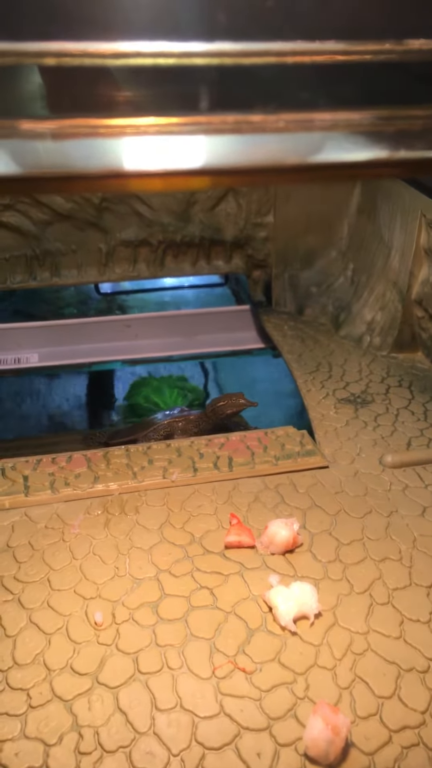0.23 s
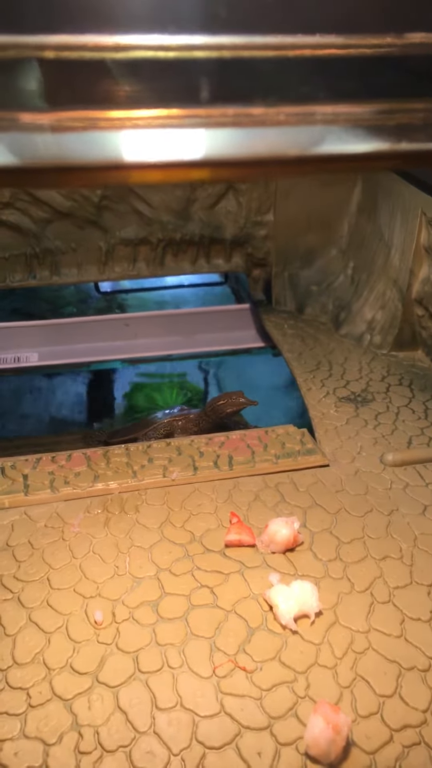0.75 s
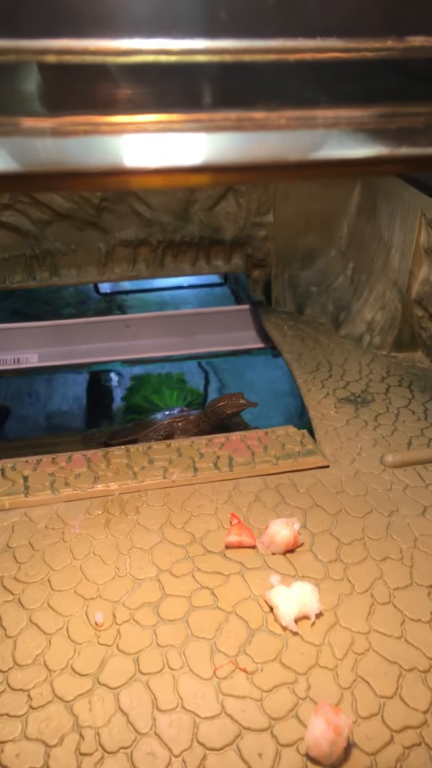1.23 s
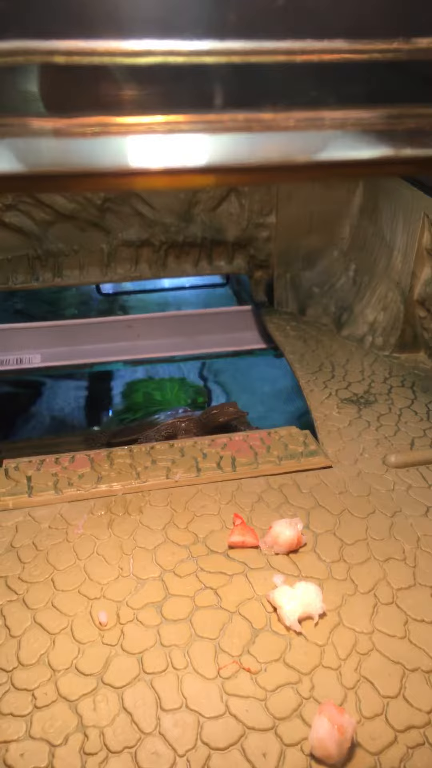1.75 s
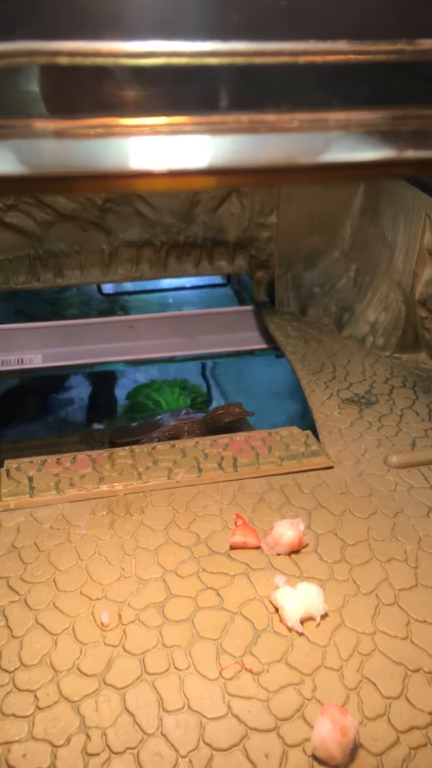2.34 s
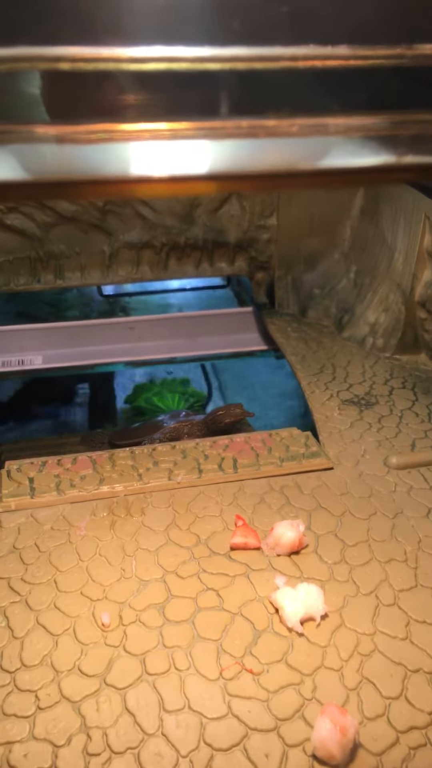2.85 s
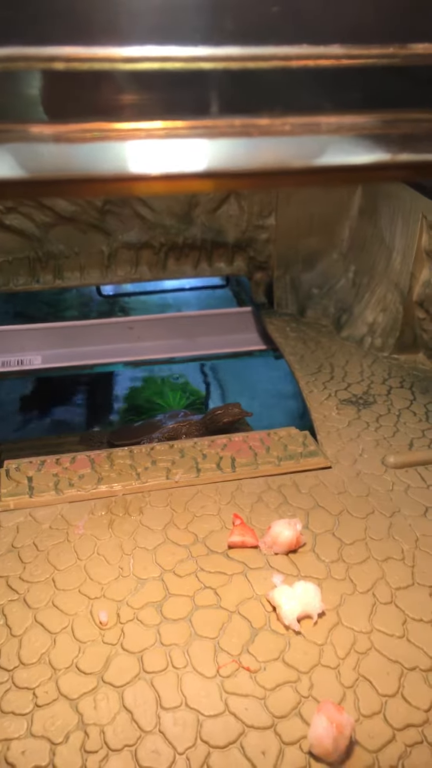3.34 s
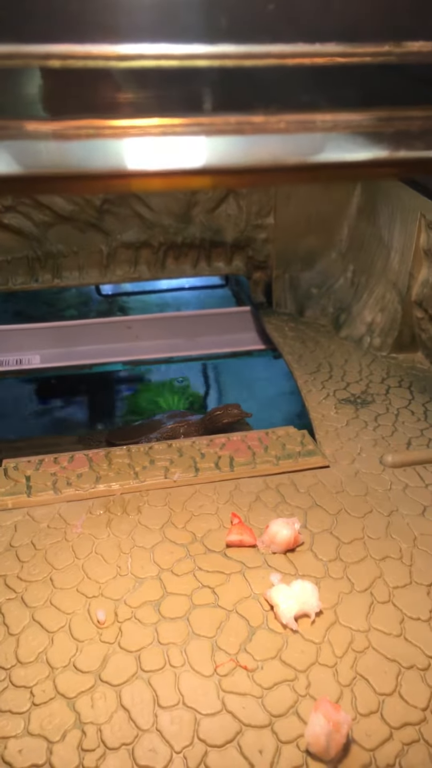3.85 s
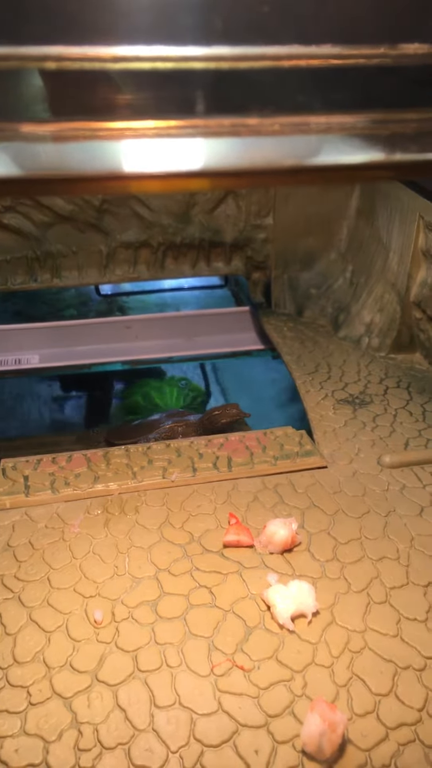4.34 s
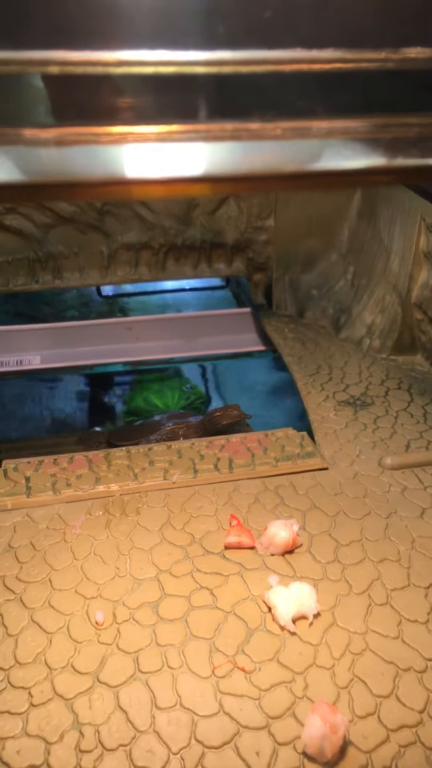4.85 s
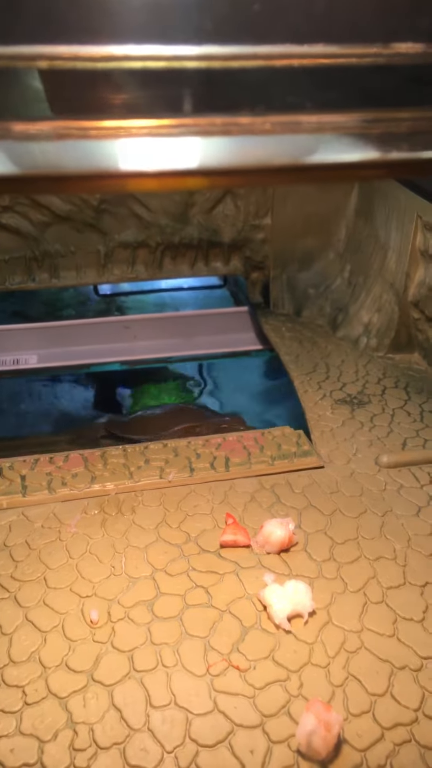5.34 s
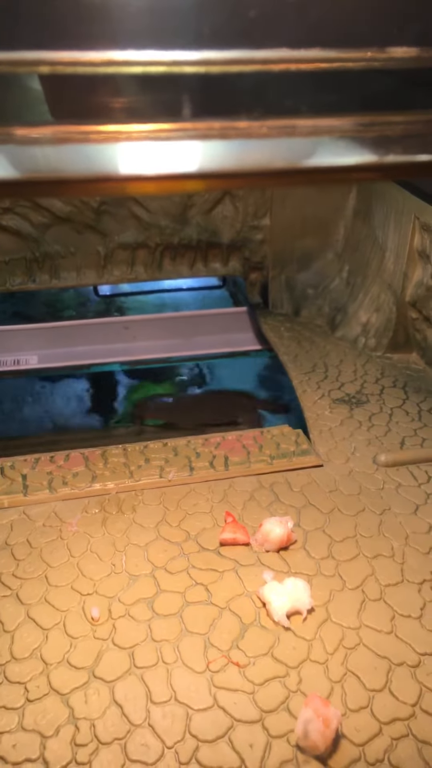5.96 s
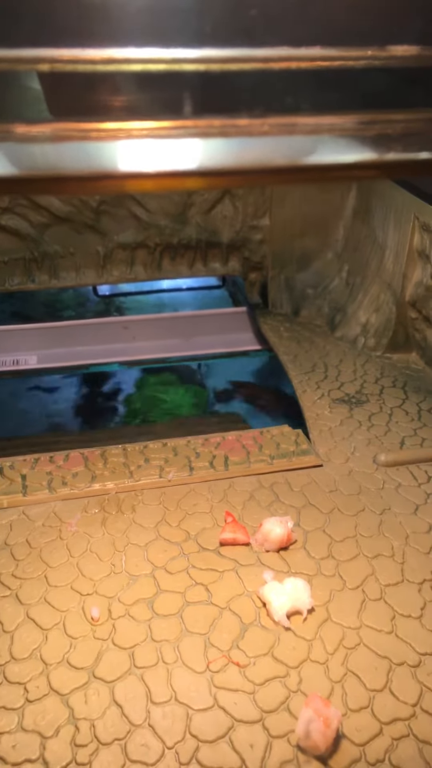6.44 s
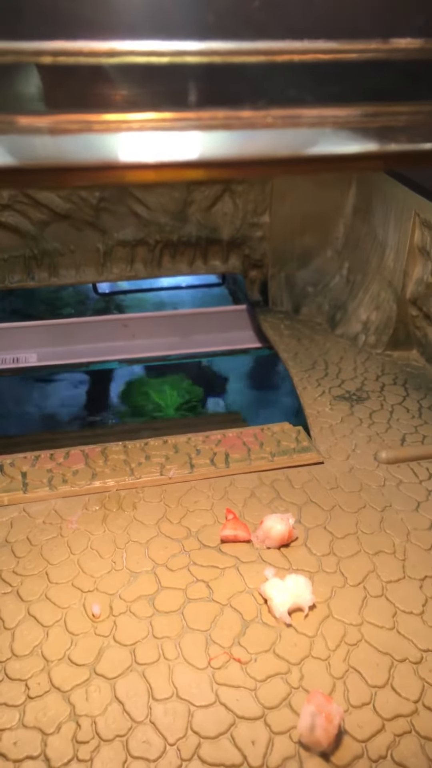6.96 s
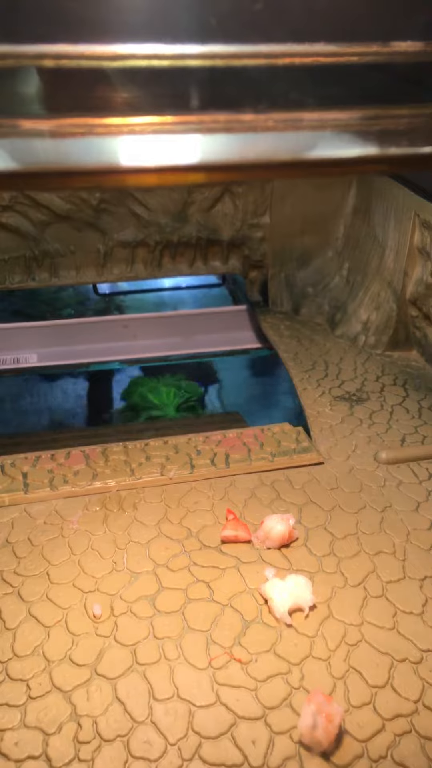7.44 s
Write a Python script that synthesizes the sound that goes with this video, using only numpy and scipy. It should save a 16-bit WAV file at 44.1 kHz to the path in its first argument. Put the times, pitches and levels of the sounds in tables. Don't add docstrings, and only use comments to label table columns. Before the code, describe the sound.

A small mains-driven aquarium pump runs throughout in a quiet room, heard close by a phone microphone. Its deep steady hum carries a faint casing buzz, a soft impeller whirr and a low watery rumble that swells and sinks unevenly several times a second, under a thin hiss. Very faint high bubbles fizz and drip all along. At about 1.9 s a quick cluster of small hard clicks rings brightly, like shell on glass, with another at 2.0 s. Low soft plops and sparse light touches follow at about 2.4 to 3.9 s. Near 5.2 s a brighter scrape and knock begins a run of grainy scuffs and small ticks. A clear click comes at 6.1 s, then a denser knock, clicks and a low, dull plop around 6.3 s. The scuffing fades by 6.5 s, leaving hum, rumble and tiny drips until the end at about 7.7 s.

```python
import sys
import numpy as np
from scipy import signal
from scipy.fft import rfft, irfft, next_fast_len
from scipy.io import wavfile
from scipy.ndimage import uniform_filter1d

SR = 44100
rng = np.random.default_rng(int(sys.argv[2]) if len(sys.argv) > 2 else 0)


def int16_out(signal):
    q = np.round(np.clip(np.atleast_2d(signal).T, -1, 1) * 32767)
    wavfile.write(sys.argv[1], SR, q.astype(np.int16))


def voltage_ratio(decibels):
    exponent = np.asarray(decibels, float) / 20
    return 10 ** exponent


N = 339570

MAINS_HZ = 60.0075
# (multiple of mains [1], level [dB rms])
HUM_LINES = [(1.0, -46.4), (2.0, -64.1), (3.0, -55.9), (4.0, -60.0), (5.0, -69.3), (6.0, -59.9),
             (7.0, -85.1), (8.0, -77.9), (9.0, -78.4), (10.0, -84.9), (11.0, -88.6), (12.0, -90.7),
             (13.0, -81.6), (14.0, -77.7), (15.0, -82.5), (16.0, -84.1), (17.0, -77.2), (18.0, -91.1),
             (19.0, -91.1), (21.0, -82.4), (22.0, -91.5), (23.0, -89.2), (25.0, -98.2), (27.0, -101.9),
             (29.0, -91.3)]
# (multiple of mains [1], level [dB rms])
BUZZ_LINES = [(31, -98), (32, -85), (33, -85), (33.5, -90), (34, -82), (34.5, -93), (35, -87), (35.5, -89),
              (36, -87), (37, -89), (37.5, -95), (38, -87), (39, -95), (40, -95), (47, -100), (49, -99),
              (50, -92), (50.5, -95), (51, -91), (51.5, -92), (52, -84), (53, -97), (57, -94), (58, -99),
              (59.5, -93), (60, -95), (61, -94), (61.5, -94), (62, -96)]
# (centre [Hz], width [Hz], level [dB rms])
WHIRR_BANDS = [(100, 1.1, -66), (105, 1.1, -69), (115.5, .9, -71), (128, .9, -66.5), (241, 5.0, -62.5),
               (3090, 40, -87), (15600, 600, -91), (3588, 90, -85)]
# (frequency [Hz], density [dB per Hz])
RUMBLE_SPECTRUM = [(25, -85), (33, -84), (40, -87), (46, -75.5), (75, -76), (110, -81), (132, -80),
                   (146, -87), (165, -80), (205, -75), (225, -65.5), (256, -79), (270, -75), (345, -74),
                   (410, -92.5), (455, -97.5), (600, -98.5)]
# (frequency [Hz], density [dB per Hz])
HISS_SPECTRUM = [(700, -99.5), (1000, -92.5), (1350, -94.5), (1500, -100), (2100, -103), (2700, -111),
                 (3200, -110), (3800, -110), (4900, -115.5), (5900, -109.5), (6600, -112.5), (9500, -116.5),
                 (10500, -119.5), (15000, -122)]
# (crest time [s], level [dB rms], fade [s per 10 dB])
LOWER_SURGES = [(.2, -45, .4), (.75, -45, .25), (1.07, -50, .05), (1.26, -50, .2), (1.37, -45, .05),
                (1.69, -47, .2), (1.95, -47, .08), (2.07, -44, .08), (2.4, -45, .2), (2.57, -46, .1),
                (2.83, -53, .04), (2.92, -47, .06), (3.28, -47.5, .6), (4.01, -45, .2), (4.48, -48, .5),
                (5.09, -50, .08), (5.34, -47, .04), (5.47, -46, .05), (5.57, -47, .1), (5.7, -45, .11),
                (5.86, -45, .04), (5.95, -47, .04), (6.05, -45, .13), (6.33, -47.5, .15), (6.6, -49, .06),
                (6.73, -46, .06), (6.85, -42.5, .16), (7.24, -45, .25), (7.48, -48, .15), (7.67, -49, .05)]
LOWER_PITCH_HZ = [239, 222, 218, 227, 233, 227, 231, 230, 222, 230, 233, 225, 224, 240, 217, 219, 228, 219,
                  228, 229, 235, 223, 222, 243, 226, 227, 236, 223, 237, 223]
# (crest time [s], level [dB rms])
UPPER_SURGES = [(.22, -51), (.36, -52), (1.08, -52), (1.32, -52), (1.49, -50), (1.96, -52), (2.49, -51),
                (2.96, -51), (3.19, -52), (3.51, -51), (4.05, -51), (4.19, -51), (5.02, -52), (5.26, -51),
                (5.49, -50), (5.87, -52), (6.17, -49), (6.54, -52), (6.74, -52), (7.29, -52), (7.63, -51)]
# (delay [s], level [dB])
WALL_ECHOES = [(.0021, -17), (.0046, -16), (.0077, -15), (0.012, -17)]
# (time [s], level [dB rms])
FIZZ_LEVEL = [(0, -84), (.8, -78), (1.2, -81), (1.6, -79.5), (2.5, -78.5), (3.3, -83), (4, -83), (4.6, -79),
              (5, -78.5), (6.5, -82), (7, -80.5), (7.7, -77.5)]
# (time [s], peak [dB], frequency [Hz])
CLEAR_DROPS = [(.2633, -58, 8100), (.4604, -57, 5230), (.9218, -58, 5570), (.9682, -58, 6560),
               (1.0605, -56, 6080), (1.2146, -52.5, 5900), (1.5953, -56, 6050), (5.0246, -58, 5700),
               (2.6155, -60, 5790), (2.66, -59, 8700), (2.7727, -56, 6020), (3.2731, -54, 5770),
               (3.3499, -55, 5870), (3.1817, -57, 5960), (3.5604, -59, 6800), (3.9829, -59, 5800),
               (4.1725, -58, 6030), (4.2693, -57, 5570), (4.383, -58, 5450), (4.5811, -55, 5800),
               (4.6594, -54, 5860), (4.7153, -53, 5400), (4.839, -57, 6900), (6.4982, -54, 5900),
               (6.6493, -57, 5870), (6.9307, -52.5, 5840), (7.005, -58, 6980), (7.1257, -57, 6810),
               (7.6076, -58, 5850), (7.6421, -57, 5800)]
# (time [s], peak [dB], frequency [Hz], t60 [s])
PLOPS = [(.45, -56, 502, .11), (1.915, -50, 1910, .045), (1.995, -49, 1920, .08), (5.17, -58, 2300, .04),
         (2.41, -47, 193, .11), (3.165, -62, 2230, .035), (3.917, -53, 487, .11), (5.17, -60, 820, .1),
         (6.114, -51, 3110, .08), (6.293, -58, 3150, .1), (6.345, -43, 100, .25), (6.455, -43, 95, .2),
         (3.465, -47, 110, .12), (6.318, -54, 1580, .04), (6.35, -55, 850, .07), (6.295, -57, 2300, .04),
         (6.35, -58, 2200, .05), (6.35, -61, 3100, .04), (5.163, -58, 2050, .03), (6.02, -62, 3100, .05),
         (1.841, -62, 9300, .03), (2.7, -70, 4450, .05), (3.235, -73, 4400, .04)]
# (time [s], peak [dB], low edge [Hz], high edge [Hz], t60 [s])
KNOCKS = [(1.888, -56, 450, 950, 0.25), (3.558, -66, 6300, 8800, .2), (5.52, -66, 6800, 9500, .2),
          (5.815, -61, 8200, 9800, .12), (5.16, -58, 430, 720, .2), (6.315, -56, 450, 750, .2),
          (1.905, -56, 2900, 3500, .08), (6.098, -66, 2900, 3500, 0.12), (6.305, -62, 1450, 1850, 0.13),
          (6.315, -55, 750, 1150, .15), (5.44, -64, 2900, 3500, .2), (6.343, -49, 280, 420, .07),
          (1.985, -57, 540, 1040, 0.087), (5.17, -55.5, 1400, 2500, 0.1), (5.17, -53, 3500, 4100, .08),
          (5.166, -55, 6900, 7600, .07), (5.168, -59, 8600, 9400, .07), (6.1, -58, 7000, 7700, .1),
          (1.9, -56, 3200, 4500, .08), (6.335, -59, 4000, 4600, .08), (6.282, -60, 5500, 6300, 0.1),
          (6.345, -45, 70, 200, 0.52), (5.26, -62, 8400, 9000, .2), (5.255, -62, 7000, 7500, .2),
          (5.5, -66, 5600, 6100, .4), (1.8, -71, 3600, 4100, .6), (6.3, -60, 1500, 2500, .1),
          (5.438, -57, 450, 1260, 0.3), (6.29, -61, 1500, 3500, 0.3), (6.335, -57, 760, 1150, 0.2),
          (6.33, -59, 1540, 1880, 0.1), (6.33, -60, 2020, 2260, .12), (6.90, -57, 470, 520, 0.13)]
# (time [s], peak [dB], frequency [Hz], t60 [s])
RINGS = [(1.8635, -53, 5650, .02), (1.878, -52, 5800, .02), (1.8882, -37, 5650, .025),
         (1.862, -52, 950, .03), (1.868, -58, 4000, .025), (1.888, -53, 900, .05), (1.894, -53, 9500, .025),
         (1.9015, -48, 9200, .025), (1.932, -54, 560, .07), (1.8885, -48, 3270, .025),
         (1.8885, -51, 4460, .02), (1.894, -47, 3910, .025), (1.9015, -42, 5890, .03),
         (1.902, -48, 4080, .03), (1.902, -51, 7240, .03), (1.9075, -50, 3850, .02),
         (1.9075, -54, 8730, .02), (1.914, -56, 3100, .03), (1.9838, -35, 5700, .03),
         (1.984, -53, 1800, .06), (1.997, -60, 7000, .04), (1.99, -61, 4200, .05),
         (3.4635, -49, 5400, .015), (3.471, -55, 5200, .015), (5.1715, -51, 3830, .035),
         (5.1725, -51, 7150, .03), (5.1745, -53, 9040, .02), (5.174, -52, 1640, .04),
         (5.174, -50, 815, .12), (5.269, -53, 5600, .015), (5.442, -60, 2210, .04), (5.442, -61, 3250, .03),
         (5.443, -57, 800, .07), (5.45, -57, 1030, .05), (5.446, -56, 600, .05), (5.465, -57, 826, .05),
         (5.476, -57, 1000, .04), (6.0515, -53, 5700, .02), (6.097, -41, 5700, .03),
         (6.098, -51, 7200, .06), (6.31, -56, 1520, .03), (6.333, -45, 5500, .02), (6.333, -54, 3300, .03),
         (6.334, -54, 4430, .025), (6.335, -51, 1710, .05), (6.338, -55, 2210, .06), (6.34, -55, 3120, .04),
         (6.342, -47, 5800, .03), (6.341, -51, 1000, .05), (6.333, -53, 825, .07)]
# (time [s], peak [dB], t60 [s], dull part [dB], bright part [dB])
CLICKS = [(1.0131, -63, .054, 0, -6), (1.8627, -43, .041, -16, -13), (1.877, -49, .048, -14, -18),
          (1.8878, -38, .035, -7, -5), (1.902, -43, .035, -9, -6), (1.9075, -44, .03, -5, -6),
          (1.917, -55, .03, 3, -8), (1.9836, -38, .04, -16, -10), (2.4613, -55.5, .06, -14, -4),
          (3.1797, -60, .06, 2, -15), (3.38, -56, .045, -14, -18), (3.463, -52, .03, -6, -4),
          (3.4715, -57, .05, -18, -16), (3.7444, -58, .06, -8, -17), (5.2645, -49, .05, -6, -8),
          (5.381, -56, .08, -6, -10), (5.4411, -60, .04, 5, -10), (5.4465, -61, .04, -6, -12),
          (5.462, -59, .04, 0, -4), (5.6735, -56, .04, -4, -8), (6.0103, -58, .04, 0, -6),
          (6.066, -63, .04, 7, -8), (6.105, -49, .03, -16, -14), (6.111, -57, .03, -14, -10),
          (6.2053, -68, .04, 12, -10), (6.2572, -59, .04, -8, -10), (6.2861, -51, .03, -8, -12),
          (6.2906, -50, .03, -3, -12), (6.298, -53, .03, 2, -12), (6.304, -56, .025, 0, -12),
          (6.339, -45, .03, -6, -6), (6.346, -48, .025, -8, -8), (5.8174, -54, .05, -25, 6),
          (6.0506, -52, .06, -5, -16), (6.0972, -45, .04, -24, -6), (6.332, -38, .045, -10, -3)]
# (time [s], peak [dB], t60 [s], dull part [dB], bright part [dB])
SCUFFS = [(1.825, -59, .3, -2, -4), (1.841, -63, .12, -2, -6), (1.895, -50, .09, -2, -10),
          (1.912, -58, .071, 7, -15), (3.475, -61, .3, -14, -12), (3.695, -58, .15, 1, -8),
          (5.02, -62, .092, -10, -12), (5.156, -49, .11, -1, 0), (5.171, -46, .075, -3, 3),
          (5.192, -58, .1, 2, 0), (5.215, -52.5, .22, -8, -6), (5.25, -52, .21, -4.5, -6.5),
          (5.29, -57, .19, 2, -4), (5.435, -55, .27, 1, -9), (5.51, -54, .4, -2.5, -6),
          (5.67, -54.5, .19, -2, -6), (5.75, -54, .31, 0, -10), (5.86, -53.5, .25, -1, -9),
          (6.002, -49.5, .16, -2.5, -3), (6.06, -58, .086, 1, -6), (6.105, -54, .21, -3, -11),
          (6.195, -64, .12, 5, -10), (6.25, -58, .2, -10, -12), (6.281, -53, .12, 2, -8),
          (6.337, -51, .06, 0, -7), (6.41, -60, .26, -9, -12)]
# (frequency [Hz], density [dB per Hz])
CONTACT_SPECTRUM = [(600, -19), (1500, 2.5), (2200, -0.5), (2650, -8), (3300, 3), (4300, -11.5),
                    (4900, -23.5), (5850, -8), (6500, -19), (7300, -17.5), (9500, -10.5), (10500, -18),
                    (12500, -15.5), (15600, -27)]


def at_hz(points, hz):
    point_hz, level_db = np.transpose(points)
    return np.interp(np.log(hz + 1), np.log(point_hz), level_db)


def in_time(rows):
    s, level_db = np.transpose(rows)
    return voltage_ratio(np.interp(np.arange(N) / SR, s, level_db, left=-150, right=-150))


def rms_one(x):
    return x / np.sqrt(np.mean(x ** 2) + 1e-30)


def coloured(x, points):
    size = next_fast_len(len(x))
    gain = voltage_ratio(at_hz(points, np.fft.rfftfreq(size, 1 / SR))) * np.sqrt(SR / 2)
    return irfft(rfft(x, size) * gain, size)[:len(x)]


def band(x, low_hz, high_hz):
    return signal.sosfilt(signal.butter(4, [low_hz, high_hz], "band", fs=SR, output="sos"), x)


def drift(rate_hz):
    r = np.exp(-80 * np.pi * rate_hz / SR)
    white = rng.standard_normal(N // 40 + 2002)
    slow = signal.lfilter([1], [1, -2 * r, r * r], white)[2000:]
    return np.interp(np.arange(N) / 40, np.arange(len(slow)), rms_one(slow))


def add(out, s, sound):
    at = int(s * SR)
    out[at:at + len(sound)] += sound[:N - at]


def enclosure(x):
    out = x + sum(voltage_ratio(level_db) * np.roll(x, int(lag_s * SR)) for lag_s, level_db in WALL_ECHOES)
    return out / np.sqrt(1 + sum(voltage_ratio(2 * level_db) for _, level_db in WALL_ECHOES))


def churn():
    rise_db_per_s, upper_slope_db_per_s, wander_hz = 200, 60, 3.0
    t = np.arange(N) / SR
    lower_db = -55 + 2.0 * drift(6)
    for s, crest_db, fade_s in LOWER_SURGES:
        surge_db = np.minimum(rise_db_per_s * (t - s), 10 * (s - t) / fade_s)
        lower_db = np.maximum(lower_db, crest_db - .7 + surge_db)
    wander = drift(7)
    upper_db = -56 + 0.05 * (lower_db - lower_db.mean()) + 1.0 * wander
    for s, crest_db in UPPER_SURGES:
        upper_db = np.maximum(upper_db, crest_db - upper_slope_db_per_s * np.abs(t - s))
    crest_s = np.transpose(LOWER_SURGES)[0]
    stepped_hz = np.take(LOWER_PITCH_HZ, np.searchsorted(crest_s[1:] - .05, t))
    pitch_hz = uniform_filter1d(stepped_hz, size=2000) + wander_hz * wander
    tone = np.sqrt(2) * np.cos(2 * np.pi * np.cumsum(pitch_hz) / SR)
    return voltage_ratio(lower_db), voltage_ratio(upper_db), tone


def tank(swell, patchy_db):
    rumble = coloured(rng.standard_normal(N), RUMBLE_SPECTRUM + [(700, -140)])
    lower_gain, upper_gain, tone = churn()
    for edges_hz, gain, clear in (([208, 250], lower_gain, .65), ([262, 352], upper_gain, 0)):
        boom = signal.sosfiltfilt(signal.butter(2, edges_hz, "band", fs=SR, output="sos"), rumble)
        steady = boom / np.sqrt(uniform_filter1d(boom ** 2, size=3000) + 1e-12)
        surging = gain * (np.sqrt(1 - clear) * steady + np.sqrt(clear) * tone)
        rumble += swell * (surging - boom)
    rumble = signal.sosfilt(signal.butter(2, 18, "high", fs=SR, output="sos"), rumble)
    hiss = coloured(rng.standard_normal(N), [(590, -140), RUMBLE_SPECTRUM[-1]] + HISS_SPECTRUM)
    return rumble + enclosure(hiss) * voltage_ratio(patchy_db * drift(13))


def bubble(hz, cycles, rise):
    t = np.arange(900) / SR
    ring = np.sin(2 * np.pi * hz * t * (1 + rise * t))
    return ring * np.exp(-np.log(1000) * hz * t / cycles) * np.minimum(t / 0.00069, 1)


def fizz(per_s, cycles, rise):
    out = np.zeros(N)
    born = np.flatnonzero(rng.random(N) < per_s * voltage_ratio(6 * drift(12)) / SR)
    size = drift(28.3)
    for at, (scatter, strength) in zip(born, rng.standard_normal((len(born), 2))):
        hz = np.clip(6500 * np.exp(0.146 * size[at] + .12 * scatter), 3500, 11000)
        add(out, at / SR, voltage_ratio(2.7 * strength) * bubble(hz, cycles, rise))
    out = coloured(out, [(4600, -8.5), (5900, -1), (6700, -5.5), (9500, 1.5), (10500, -7)])
    return in_time(FIZZ_LEVEL) * rms_one(out)


def drip(count):
    late, size, pitch = rng.standard_normal((count, 3)).T
    s = np.abs(np.arange(count) + .5 + .4 * late) * (N / SR - .1) / count
    peak_db = -62 + 1.5 * size
    hz = 6100 * np.exp(.12 * pitch)
    return list(zip(s, peak_db, hz))


def droplets(cycles, rise):
    out = np.zeros(N)
    drops = CLEAR_DROPS + drip(count=50)
    for (s, peak_db, hz), chance in zip(drops, rng.random((len(drops), 6, 2))):
        add(out, s, voltage_ratio(peak_db - 3.5) * bubble(hz, cycles, rise))
        for late, smaller in chance:
            shed = bubble(hz * (.95 + .13 * smaller), cycles, rise)
            add(out, s + 0.049 * late, voltage_ratio(peak_db - 9.5 - 5.3 * late) * shed)
    return out


def plops(rough):
    out, t = np.zeros(N), np.arange(SR // 2) / SR
    wobble = np.tile(drift(40), 2)
    for s, peak_db, hz, t60_s in PLOPS:
        ring = np.sin(2 * np.pi * hz * t) * voltage_ratio(peak_db - 60 * (t / t60_s) ** 1.7)
        uneven = 1 + rough * wobble[int(s * SR):][:len(t)]
        add(out, s, ring * (1 - np.exp(-t * 14 / t60_s)) * uneven)
    return out


def knocks():
    out, t = np.zeros(N), np.arange(SR // 4) / SR
    noises = rng.standard_normal((len(KNOCKS), len(t)))
    for (s, peak_db, low_hz, high_hz, t60_s), noise in zip(KNOCKS, noises):
        envelope = voltage_ratio(peak_db - 60 * t / t60_s) * (1 - np.exp(-t / 0.004))
        add(out, s, rms_one(band(noise, low_hz, high_hz)) * envelope)
    return out


def rings():
    partner_share, partner_ratio = .55, 1.045
    out, t = np.zeros(N), np.arange(4000) / SR
    for s, peak_db, hz, t60_s in RINGS:
        pair = np.sin(2 * np.pi * hz * t) + partner_share * np.sin(2 * np.pi * hz * partner_ratio * t)
        onset_s = max(.0008, 3 / 4 / hz)
        envelope = voltage_ratio(peak_db - 60 * t / t60_s) * (1 - np.exp(-t / onset_s))
        add(out, s, pair / np.hypot(1, partner_share) * envelope)
    return out


def contacts(tail_db, tail_t60_s, grain_db, echo):
    noise = coloured(rng.standard_normal(N), CONTACT_SPECTRUM)
    grain = voltage_ratio(grain_db * drift(180))
    dull = rms_one(band(noise, 900, 4400))
    middle = rms_one(band(noise, 4600, 7520))
    bright = rms_one(band(noise, 7500, 16400))
    out, t = np.zeros(N), np.arange(12000) / SR
    touches = [(row, False) for row in CLICKS] + [(row, True) for row in SCUFFS]
    lags = rng.integers(22, 60, len(touches))
    for ((s, peak_db, t60_s, dull_db, bright_db), scuff), lag in zip(touches, lags):
        part = slice(int(s * SR), int(s * SR) + len(t))
        wide = voltage_ratio(dull_db) * dull[part] + voltage_ratio(bright_db) * bright[part]
        mix = middle[part] + (wide + echo * np.roll(wide, lag)) / np.hypot(1, echo)
        fall = voltage_ratio(-60 * t / t60_s) + voltage_ratio(tail_db - 60 * t / tail_t60_s)
        if scuff:
            fall *= grain[part]
        onset_s = .06 * t60_s if scuff else .0006
        add(out, s - .0005, voltage_ratio(peak_db - 9.5) * mix * fall * (1 - np.exp(-t / onset_s)))
    for (s, peak_db, *_), off in zip(CLICKS, rng.standard_normal(len(CLICKS))):
        port = bubble(5820 * (1 + .012 * off), cycles=90, rise=0)
        add(out, s - .0003, voltage_ratio(peak_db - 5) * port)
    return out


def whirr():
    out = np.zeros(N)
    for hz, width_hz, level_db in WHIRR_BANDS:
        r = np.exp(-np.pi * width_hz / SR)
        poles = [1, -2 * r * np.cos(2 * np.pi * hz / SR), r * r]
        once = signal.lfilter([1, 0, -1], poles, rng.standard_normal(N + SR))
        twice = signal.lfilter([1], poles, once)
        out += voltage_ratio(level_db) * rms_one(twice[SR:])
    return out


def motor(waver_db):
    turn, out = 2 * np.pi * MAINS_HZ * np.arange(N) / SR, np.zeros(N)
    for lines, spread_rad in ((HUM_LINES, 3.0), (BUZZ_LINES, .8)):
        for multiple, level_db in lines:
            phase = np.round(2 * multiple) / 2 * turn + spread_rad * rng.standard_normal()
            out += np.sqrt(2) * voltage_ratio(level_db) * np.cos(phase)
    return out * voltage_ratio(waver_db * drift(1.7))


def scene():
    pump = motor(waver_db=.7) + whirr() + tank(swell=1.0, patchy_db=0.76)
    outlet = fizz(per_s=200, cycles=75, rise=4.0) + droplets(cycles=123, rise=4.0)
    water = enclosure(outlet) + plops(rough=.35)
    touches = contacts(tail_db=-24, tail_t60_s=0.15, grain_db=3.0, echo=0.6)
    return (pump + water + knocks() + enclosure(rings()) + touches)[None]


def roll_off(x):
    return signal.sosfilt(signal.butter(12, 15775, fs=SR, output="sos"), x)


def record(dry):
    cut = signal.sosfilt(signal.ellip(12, .3, 70, 15800, fs=SR, output="sos"), dry)
    return roll_off(cut)


dry = scene()
out = record(dry)
int16_out(out)
```